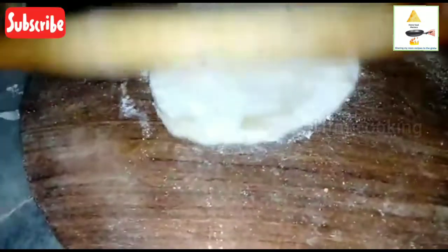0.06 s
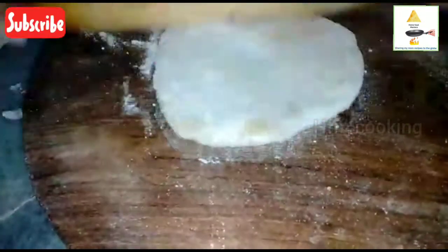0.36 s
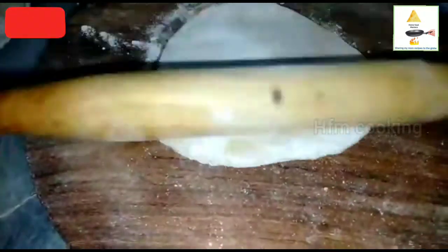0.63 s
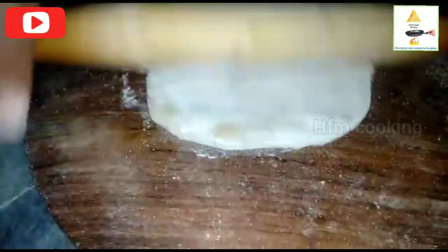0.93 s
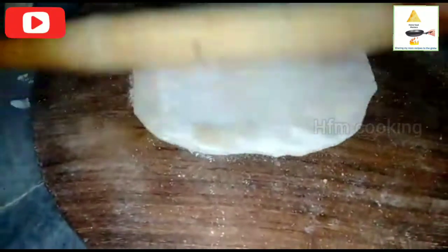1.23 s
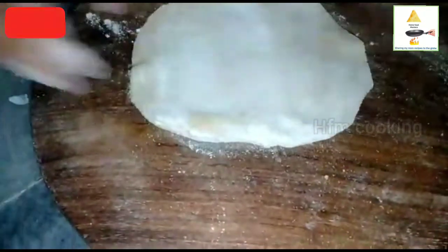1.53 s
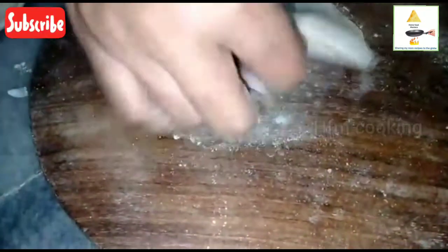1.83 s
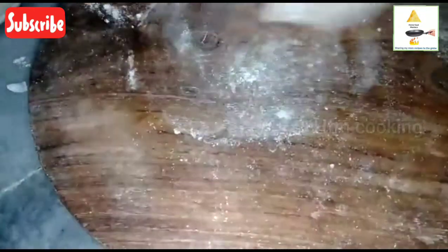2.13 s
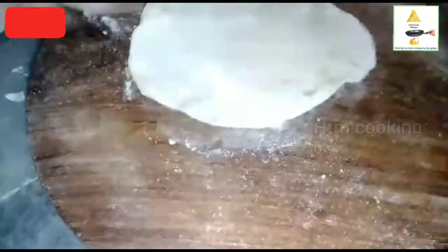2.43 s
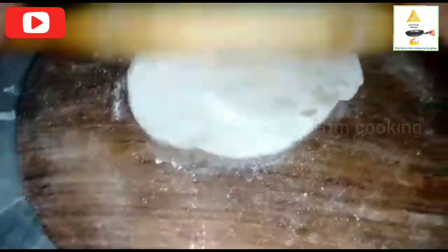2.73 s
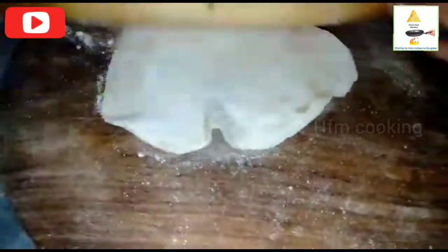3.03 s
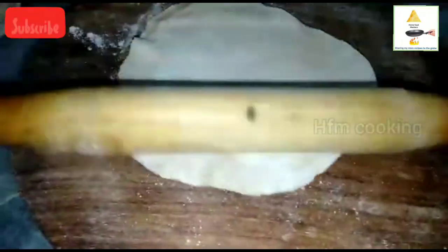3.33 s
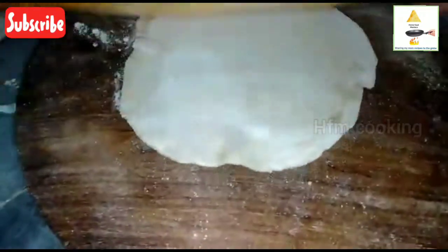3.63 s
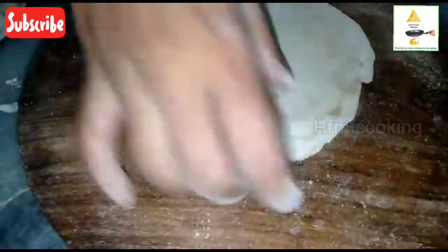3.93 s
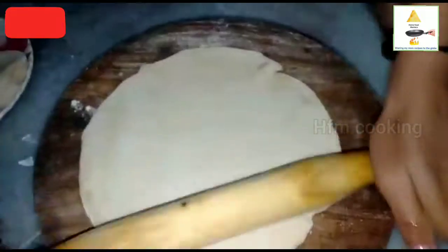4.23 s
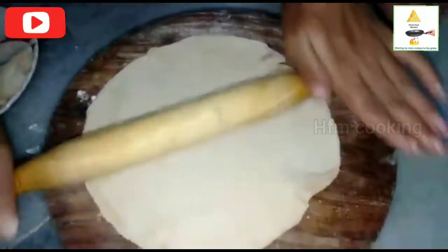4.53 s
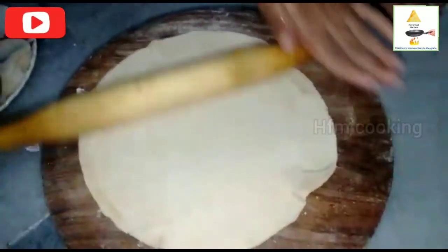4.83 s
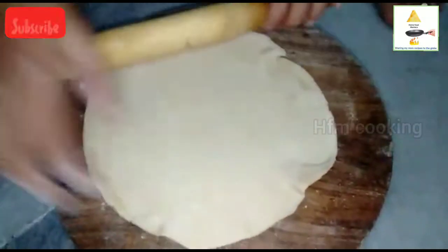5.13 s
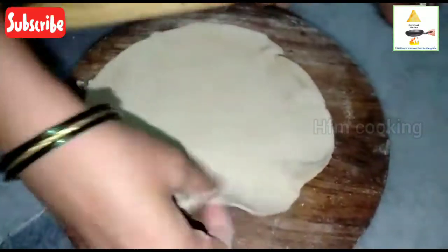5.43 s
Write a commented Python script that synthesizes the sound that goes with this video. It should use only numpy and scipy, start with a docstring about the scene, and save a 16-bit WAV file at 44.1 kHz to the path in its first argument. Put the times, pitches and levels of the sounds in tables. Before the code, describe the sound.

A wooden board rocks and knocks hollowly on a counter as dough is rolled out with faint back-and-forth rubbing. Two firm knocks come first, then a bright rolling pin clack with a jingle of bangles. After a lull of soft sliding, the dough slaps down, the pin clacks sharply and the knocks resume, growing lighter toward the end. It sounds close, in a small kitchen with a faint hum.

```python
"""A round wooden board rocks and knocks on the counter of a small kitchen as flatbread dough is rolled out.
The rolling pin rubs under the palms with each stroke and now and then clacks down, hard and bright.
Bangles on the wrist touch and jingle. The dough slides over flour and slaps onto the board,
and lighter pats of dough and fingers make the flour dish ring.
Room air, a faint hum and a thin whine lie underneath."""
import sys
import numpy as np
from scipy import signal
from scipy.fft import rfft, irfft
from scipy.io import wavfile

SR = 44100
rng = np.random.default_rng(int(sys.argv[2]) if len(sys.argv) > 2 else 0)


def dump_mix(stems):
    """Bounce the given channels to the path in sys.argv[1] as a 16-bit WAV at rate SR."""
    frames = np.atleast_2d(stems).T  # one column per channel
    limited = np.clip(frames, -1, 1)  # hard clip at full scale
    pcm = np.round(limited * 32767).astype(np.int16)
    wavfile.write(sys.argv[1], SR, pcm)


N = 245637
TIME = np.arange(N) / SR
AGE = TIME[:SR * 2 // 5]   # seconds since a hit

# A mode is one tone of a ringing thing; t60 is the time it takes to fade by 60 dB.
# A colour is how strong a noise is from low to high. Above a cutoff the sound is dulled.
# the board's knocks: t/s, level/dB, cutoff/Hz, pitch factor, extra thud/dB, extra upper modes/dB
KNOCKS = [(0.0, -12.5, 1600, 0.96, -9.5, -2.5), (0.478, -12.5, 2600, 0.95, -14, -0.5),
          (1.52, -38.5, 4500, 1.05, -4, 1), (1.65, -52.5, 1210, .97, 3.5, -5),
          (2.385, -39, 1510, 1.1, 3.5, -2), (2.723, -18, 930, 0.99, -14.5, 1),
          (3.1254, -18.5, 1920, 0.95, -13, -4.5), (3.7489, -24.5, 2060, 0.91, -3.5, 9),
          (4.0594, -30.5, 1080, 0.97, 2, -14), (4.069, -31, 1010, 1.06, -7.5, 3),
          (4.831, -54.5, 1476, 1.12, -22, -3), (5.162, -51, 900, 1.04, -32, 6),
          (5.246, -33, 4100, 1, -10, -0.5), (5.312, -42.5, 1100, 1.04, -11, 9)]
# the board bouncing on the counter: f/Hz, level/dB, t60/s
BOUNCE_MODES = [(436, -17.5, 0.022), (577, -30, 0.019), (687.4, -5.5, 0.021), (738, 0.5, 0.048)]
# the board's higher tones: f/Hz, level/dB, t60/s
UPPER_MODES = [(1360, -8.5, 0.01), (1312, -18, 0.081), (1446, -20, 0.074), (2164, -13, 0.015)]
# the hollow under the board, which takes up the ring and sings on: f/Hz, level/dB, t60/s
HOLLOW_MODES = [(718.6, -17.5, 0.34)]
# the dull thud of a knock: f/Hz, level/dB
THUD_COLOUR = [(60, -22.5), (150, -3), (270, -0.5), (390, 0.5), (550, 2), (950, -5), (1400, -4.5),
               (2200, -5), (3000, -10.5), (8000, -10)]
# bouts of rolling to and fro: start/s, end/s, one stroke/s
BOUTS = [(-0.01, 1.586, .228), (2.44, 3.832, .232), (3.985, 5.755, .295)]
# how hard the palms press, as loudness of the rubbing: t/s, level/dB
PRESSURE = [(0.1, -60.5), (0.35, -62), (0.8, -67), (1.26, -59), (1.5, -63.5), (2.7, -58), (3.2, -60.5),
            (3.5, -60), (4.4, -67.5), (4.75, -71.5), (5.05, -76), (5.35, -68.5)]
# the pin rubbing under the palms: f/Hz, level/dB
RUB_COLOUR = [(300, -10), (600, -6), (725, 14), (850, -8), (1400, -1.5), (2250, -1), (2420, 10),
              (2580, -5.5), (3000, -5.5), (3700, -2), (3930, 4.5), (4300, -2.5), (5900, -5), (6900, 3.5),
              (8500, -7.5), (15000, -5)]
# the air in the room: f/Hz, level/dB
AIR_COLOUR = [(30, -4), (70, -15.5), (110, -12.5), (185, -8), (300, -18), (720, -18), (1500, -23.5),
              (3000, -28), (5000, -31), (6800, -24), (9000, -32), (15500, -27)]
# the rise and fall of the low hum: t/s, level/dB
HUM_LEVELS = [(0.0, -65), (0.03, -72.5), (1.15, -68.5), (1.35, -73), (1.63, -63.5), (2.2, -71.5),
              (2.45, -63), (3.52, -71), (3.57, -66), (4.1, -65), (4.2, -84), (4.39, -71), (4.73, -84),
              (4.78, -71.5), (5.3, -69), (5.57, -83.5)]
# bangles meeting: t/s, level/dB, length of the chatter/s
JINGLES = [(0.085, -42, .016), (0.59, -34, .014), (1.0535, -23, .007), (1.622, -35, .013),
           (2.495, -25.5, .008), (2.811, -41.5, .01), (3.2636, -28, .007), (3.899, -42.5, .008),
           (3.932, -45, .012), (4.076, -41.5, .01), (4.599, -48, .005), (5.202, -46.5, .003),
           (5.227, -38, .02)]
# the ring of one bangle: f/Hz, level/dB, t60/s
BANGLE_MODES = [(6115, -8, .13), (6250, -11, .04), (6800, -7, .05), (7080, -10, .07), (7550, -12, .035),
                (8480, -16, .04), (11200, -11, .04), (11600, -2, .09), (11680, -3, .12), (11780, -3, .1),
                (11900, -7, .06), (12550, -9, .04), (12948, -1, .13), (14600, -10, .035)]
# the tick of two bangles touching: f/Hz, level/dB
TICK_COLOUR = [(2000, -19), (5000, -12), (6600, 6), (9500, -10), (12000, 6.5), (16000, 8.5)]
# the pin's clacks: t/s, level/dB, cutoff/Hz, pitch factor, extra upper modes of the jolted board/dB
CLACKS = [(1.0564, -21, 12600, 1.22, -14), (2.4941, -16.5, 5900, 0.96, 22),
          (2.5008, -24.5, 4530, 0.88, -1.5), (3.325, -43, 6000, 1.08, 11)]
# the pin's brief ring: f/Hz, level/dB, t60/s
PIN_MODES = [(2380, -17, .03), (3700, -4, .028), (3930, -3, .028), (4280, -3, .02), (4850, -4, .016),
             (6850, -4, .018), (8450, -10, .025)]
# the ring that lingers after a clack: f/Hz, level/dB, t60/s
LINGER_MODES = [(3485, -3, .25), (3637, -1, .22), (3785, 0, .2), (3900, 3, .25), (3975, 3, .28),
                (4060, -1, .18), (4190, -1, .25), (4720, -8, .3), (5160, -9, .35), (6110, -1, .2)]
# the sharp crack of a clack: f/Hz, level/dB
CRACK_COLOUR = [(500, -40), (1450, -15), (3000, -22), (3800, 5.5), (5100, -1), (6200, -2.5), (7200, 2),
                (10000, -10), (16000, -2.5)]
# dough sliding over flour, at its loudest: t/s, level/dB
SLIDES = [(1.48, -59.5), (1.72, -65.5), (1.91, -61.5), (2.088, -60), (3.77, -56)]
# the hiss of a slide: f/Hz, level/dB
SLIDE_COLOUR = [(300, -12), (1400, 0), (2200, 2), (3000, -4), (4200, -2.5), (7000, -2.5), (11000, -2.5),
                (16000, -1)]
# dough slapping onto the board, and lighter pats: t/s, level/dB, cutoff/Hz, extra ring of the dish/dB
PATS = [(1.701, -48, 5000, -15), (2.3845, -24, 3360, -18), (2.391, -32.5, 2000, -18),
        (2.3948, -31.5, 8800, -16.5), (3.676, -39.5, 1900, -24), (3.942, -49, 2200, -7),
        (3.964, -46.5, 3040, -7), (4.0004, -48, 2630, -6.5), (4.059, -38, 6100, -32),
        (4.776, -53, 5000, -24)]
# the noise of a slap or pat: f/Hz, level/dB
PAT_COLOUR = [(100, -10.5), (400, -24), (1100, -14.5), (1500, -2.5), (2200, -5.5), (4000, -9.5),
              (7000, -6.5), (15000, -19)]
# the ring of the flour dish: f/Hz, level/dB, t60/s
DISH_MODES = [(1435, -15, 0.057), (2140, 5.5, 0.054), (3357, -1, 0.066)]
# echoes off the walls: delay/s, level/dB
WALL_ECHOES = [(.0307, -16), (.069, -31.5), (.099, -31.5)]
# how long the kitchen rings: f/Hz, t60/s
KITCHEN_DECAY = [(150, 0.19), (700, 0.78), (2000, 0.26), (4000, 0.4), (8000, 0.12), (14000, 0.32)]


def from_db(db):
    """Turn decibels into a factor to multiply by."""
    return 10 ** (np.asarray(db) / 20)


def rms_one(x):
    """Scale a sound so its average strength (rms) is 1."""
    return x / np.sqrt(np.mean(x ** 2) + 1e-20)


def at_hz(points, hz):
    """Read between a table's rows, giving each octave equal room."""
    known_hz, values = np.transpose(points)
    return np.interp(np.log(hz + 1), np.log(known_hz), values)


def colour(x, spectrum):
    """Give a noise its colour, at strength 1."""
    gains = from_db(at_hz(spectrum, np.fft.rfftfreq(len(x), 1 / SR)))
    return rms_one(irfft(rfft(x) * gains, len(x)))


def drift(per_s):
    """A random wander, roughly between -1 and 1."""
    return np.interp(TIME * per_s, np.arange(N), rng.standard_normal(N))


def fade(t60):
    """Die away by 60 dB every t60 seconds."""
    return np.exp(-np.log(1000) * AGE / t60)


def ring(modes, pitch=1, uneven_db=0.0):
    """The fading tones of one hit; neighbouring modes swing against each other."""
    hz, db, t60 = np.transpose(modes)[:, :, None]
    gain = from_db(db + uneven_db * rng.standard_normal(db.shape))
    signs = (-1) ** np.arange(len(hz))[:, None]
    return np.sum(gain * signs * fade(t60) * np.sin(2 * np.pi * hz * pitch * AGE), axis=0)


def burst(spectrum, t60):
    """The many short-lived modes of a hit blur into noise that dies at once."""
    return colour(rng.standard_normal(len(AGE)), spectrum) * fade(t60)


def soften(x, cutoff_hz):
    """Take off the highs, as a softer hit does."""
    return signal.sosfilt(signal.butter(2, min(cutoff_hz, .45 * SR), fs=SR, output="sos"), x)


def add(track, s, sound):
    """Lay a sound into a track at s seconds."""
    start = max(round(s * SR), 0)
    track[start:start + len(sound)] += sound[:N - start]


def board(settle_s=0.00083, hollow_build_s=0.066):
    """The board tips onto the counter; load shifts its pitch, the landing spot sets its upper modes."""
    rings, thuds = np.zeros((2, N))
    settle = 1 - np.exp(-AGE / settle_s)   # the heavy board takes a moment to come down fully
    hollow = ring(HOLLOW_MODES) * (1 - np.exp(-AGE / hollow_build_s))
    for s, db, cutoff_hz, pitch, thud_db, upper_db in KNOCKS + nudges():
        tones = hollow + ring(BOUNCE_MODES, pitch) + from_db(upper_db) * ring(UPPER_MODES, pitch)
        thud = burst(THUD_COLOUR, t60=.036)
        add(rings, s, from_db(db) * soften(settle * tones, cutoff_hz))
        add(thuds, s, from_db(db + thud_db) * soften(settle * thud, cutoff_hz))
    echoes = sum(from_db(db) * np.interp(TIME - delay, TIME, rings, left=0) for delay, db in WALL_ECHOES)
    return kitchen(rings, tail_db=-24) + soften(echoes, cutoff_hz=1200) + kitchen(thuds, tail_db=-8)


def nudges(cutoff_hz=1400, thud_db=-11.5, upper_db=6, wobbles_per_s=3):
    """Light touches of the board, as more rows like those in KNOCKS."""
    # the board comes unstuck just before it lands
    lead_s = .035
    lifts = [(s - lead_s, db - 35.5, upper_db) for s, db, *_ in KNOCKS if s > lead_s]
    # clacks and pats shake it too
    jolts = [(s, db - 22, upper) for s, db, *_, upper in CLACKS]
    jolts += [(s, db - 11, upper_db) for s, db, *_ in PATS]
    # it rocks faintly under the moving pin, at random moments
    effort = strokes()
    moments = np.flatnonzero((rng.random(N) < wobbles_per_s / SR) & (effort > 0))
    wobbles = [(TIME[i], 20 * np.log10(effort[i]) + 7, upper_db) for i in moments]
    return [(s, db, cutoff_hz, 1, thud_db, upper) for s, db, upper in lifts + jolts + wobbles]


def strokes(speed_power=1.62, turn_db=-13):
    """How loud the pin rubs: it speeds up, then slows to turn round, where only turn_db is left."""
    motion = np.zeros(N)
    for start, end, stroke_s in BOUTS:
        speed = np.abs(np.sin(np.pi * (TIME - start) / stroke_s))
        in_bout = (TIME >= start) & (TIME < end)
        motion += in_bout * (speed ** speed_power + from_db(turn_db))
    return motion * from_db(np.interp(TIME, *np.transpose(PRESSURE)))


def rubbing(gain, spectrum):
    """Rubbing is countless tiny slips of uneven size, swelling with each movement."""
    slips = rng.standard_normal(N) * from_db(2.5 * drift(per_s=900) + 1.2 * drift(per_s=50))
    return gain * colour(slips, spectrum)


def background(hum_hz=51.7, whine_hz=15625):
    """Room air and rumble, a wavering low hum and a thin electrical whine."""
    air = from_db(-66) * colour(rng.standard_normal(N), AIR_COLOUR)
    rumble = from_db(-77) * rms_one(soften(rng.standard_normal(N), cutoff_hz=76))
    hum_db = np.interp(TIME, *np.transpose(HUM_LEVELS)) + drift(per_s=7)
    hum = from_db(hum_db) * np.sin(2 * np.pi * hum_hz * TIME + .5 * drift(per_s=7.8))
    whine = from_db(-78) * np.sin(2 * np.pi * whine_hz * TIME)
    return air + rumble + np.sqrt(2) * (hum + whine)   # sqrt(2) gives a sine strength 1


def bangles(touches=6, loss_db=0.05, pitch_spread=0.00185):
    """Each jingle is a chatter of touches between bangles of nearly the same size."""
    out = np.zeros(N)
    for s, db, length_s in JINGLES:
        delays = length_s * (np.arange(touches) + rng.random(touches)) / touches
        # the wrist muffles a light touch; a hard jolt throws the bangles free to ring on
        muffle = fade(t60=np.interp(db, [-36, -24], [.11, .5]))
        for k, delay in enumerate(delays - delays[0]):
            pitch = 1 + pitch_spread * rng.standard_normal()
            tones = from_db(-11) * muffle * ring(BANGLE_MODES, pitch, uneven_db=7.5)
            tick = from_db(1) * burst(TICK_COLOUR, t60=0.049)
            gain = from_db(db - loss_db * k) / np.sqrt(touches)
            add(out, s + delay, gain * soften(tones + tick, cutoff_hz=12200))
    return out


def pin_clacks():
    """Hard wood comes down: a crack, a brief bright ring and a faint lingering one."""
    out = np.zeros(N)
    for s, db, cutoff_hz, pitch, _ in CLACKS:
        brief = from_db(-8) * ring(PIN_MODES, pitch)
        lingering = from_db(-30) * ring(LINGER_MODES, uneven_db=-1.5)
        crack = from_db(1) * burst(CRACK_COLOUR, t60=0.024)
        add(out, s, from_db(db) * soften(brief + lingering + crack, cutoff_hz))
    return out


def dough_slides(swell_s=0.035):
    """Dough rubs over flour in soft hisses that swell and fade."""
    gain = sum(from_db(db) * np.exp(-np.minimum(((TIME - s) / swell_s) ** 2 / 2, 20)) for s, db in SLIDES)
    return rubbing(gain, SLIDE_COLOUR)


def dough_pats():
    """Dough slaps onto the board; lighter pats of dough and fingers make the flour dish ring."""
    out = np.zeros(N)
    for s, db, cutoff_hz, dish_db in PATS:
        slap = burst(PAT_COLOUR, t60=0.028)
        dish = from_db(dish_db) * ring(DISH_MODES)
        add(out, s, from_db(db) * soften(slap + dish, cutoff_hz))
    return out


def kitchen(x, tail_db, build_s=0.0023):
    """The room adds a tail of blurred echoes that lasts longest in the middle pitches."""
    age = TIME[:SR * 3 // 4]
    edges_hz = np.geomspace(60, 18000, 13)
    tail = np.zeros(len(age))
    for low, high in zip(edges_hz, edges_hz[1:]):
        band_filter = signal.butter(2, [low, high], "band", fs=SR, output="sos")
        band = signal.sosfilt(band_filter, rng.standard_normal(len(age)))
        t60 = at_hz(KITCHEN_DECAY, np.sqrt(low * high))
        tail += band * np.exp(-np.log(1000) * age / t60)
    tail *= 1 - np.exp(-(age / build_s) ** 2)
    return x + from_db(tail_db) * signal.fftconvolve(x, tail / np.linalg.norm(tail))[:N]


def scene():
    """Knocks, clacks, pats and jingles ring in the room, over the rubbing and the background."""
    rolling = rubbing(strokes(), RUB_COLOUR)
    quiet_sounds = rolling + dough_slides() + background()
    clacks = kitchen(pin_clacks(), tail_db=-11)
    pats = kitchen(dough_pats(), tail_db=-11.5)
    jingles = kitchen(bangles(), tail_db=-6.5)
    return (quiet_sounds + clacks + pats + jingles + board())[None]


def record(dry):
    """Cut away the very highest treble, steeply, above 15900 Hz."""
    return signal.sosfilt(signal.ellip(10, .1, 70, 15900, fs=SR, output="sos"), dry)


dry = scene()
out = record(dry)
dump_mix(out)
```